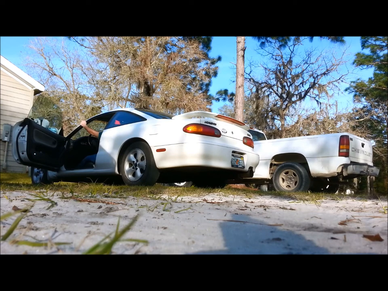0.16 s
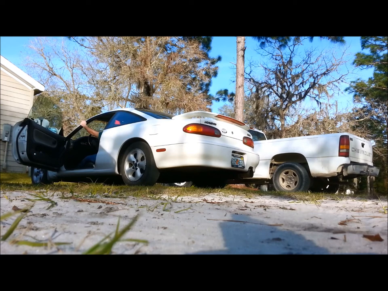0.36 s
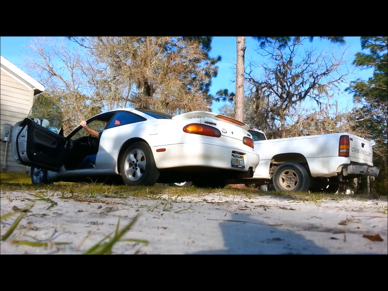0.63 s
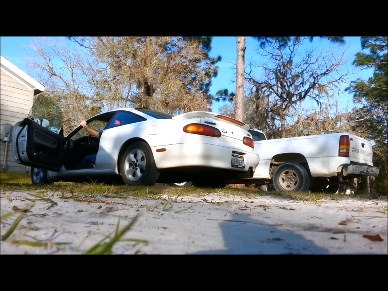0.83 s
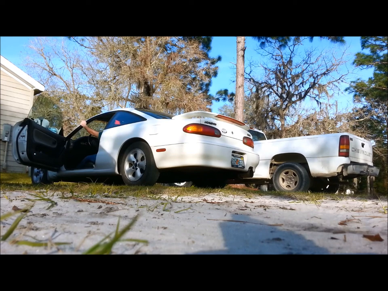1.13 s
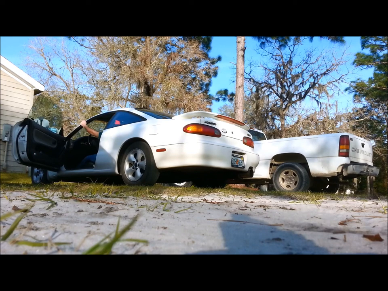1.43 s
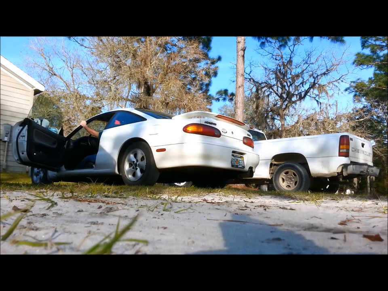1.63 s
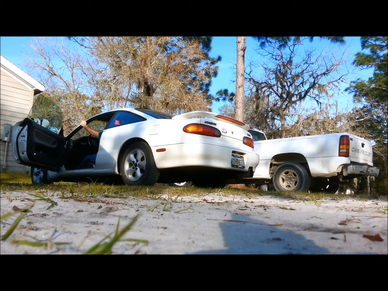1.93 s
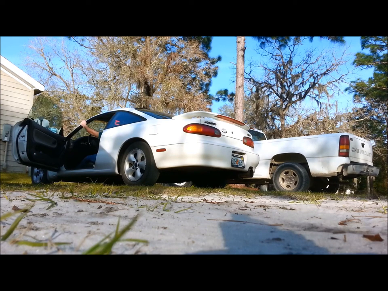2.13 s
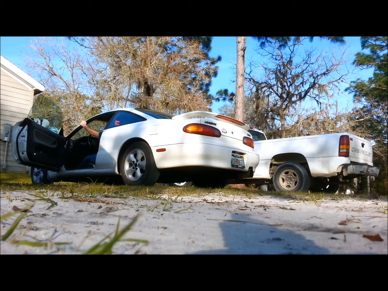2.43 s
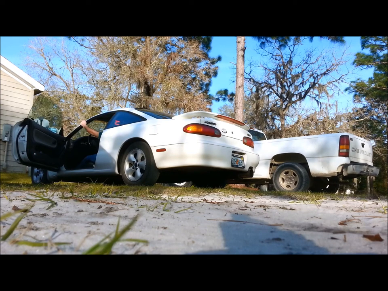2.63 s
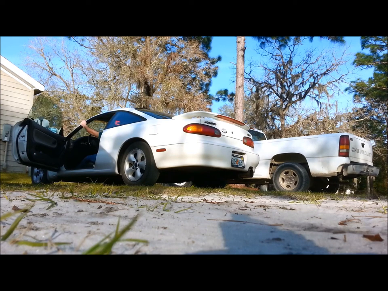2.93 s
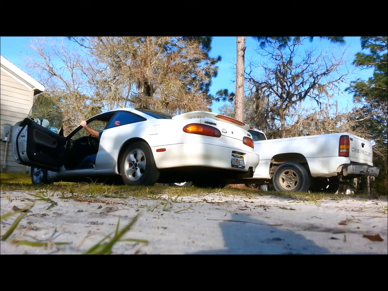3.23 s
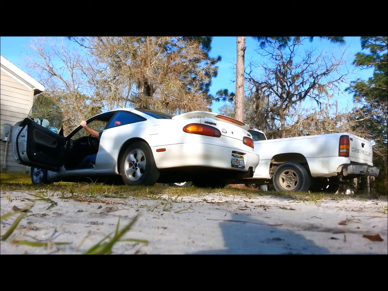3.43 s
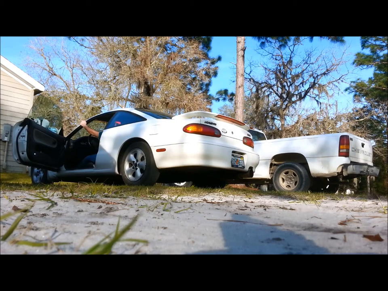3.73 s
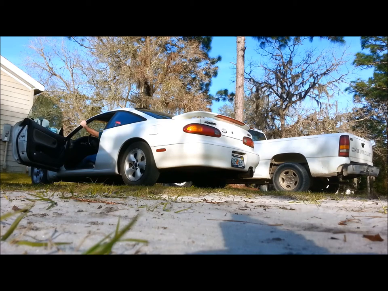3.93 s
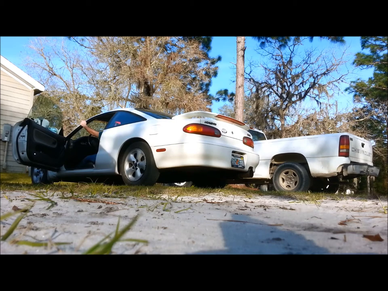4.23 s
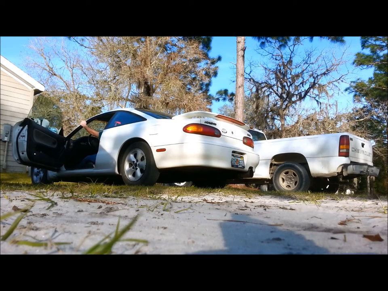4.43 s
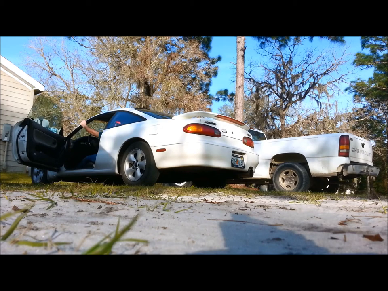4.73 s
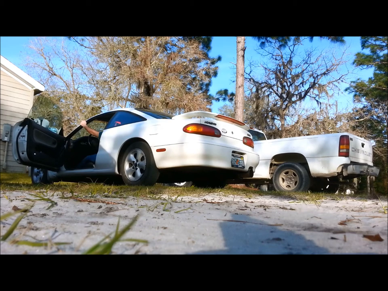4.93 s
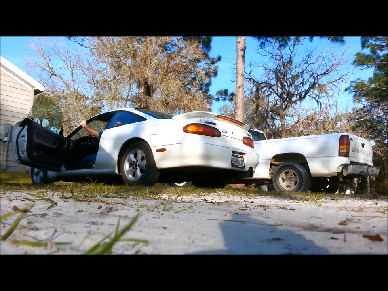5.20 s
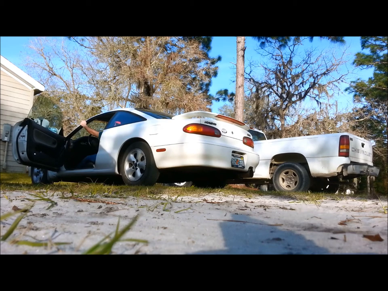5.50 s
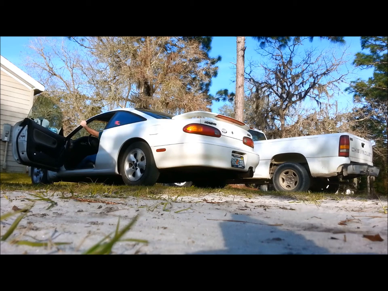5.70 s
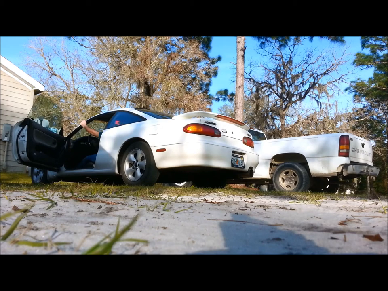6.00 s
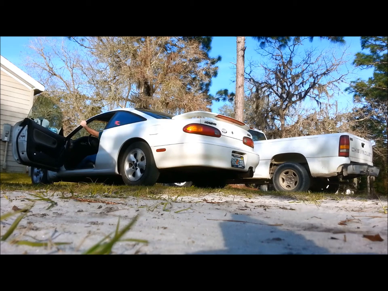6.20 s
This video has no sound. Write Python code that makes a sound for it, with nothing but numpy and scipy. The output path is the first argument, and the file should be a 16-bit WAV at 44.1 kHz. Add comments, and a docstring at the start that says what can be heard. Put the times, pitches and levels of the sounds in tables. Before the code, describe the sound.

Low burbling car exhaust outdoors, stabbed into five raspy, overloaded revs in two groups, each group's last and highest falling in a hollow drone.

```python
"""A V6 coupe idles in a yard and is revved in five blips, coasting down after each.
It stands a few metres from two microphones on the ground, with a short scattered tail around it.
Firings from two cylinder banks ring the exhaust: a low boom, a hollow bark and a metallic rasp over a drone.
Filtered noise makes tailpipe gas, intake song and microphone hiss; ringing clicks are the overload.
Engine speed and throttle set the exhaust's balance; the loudest peaks round off at full scale."""
import sys
import numpy as np
from scipy import signal
from scipy.io import wavfile
from scipy.ndimage import uniform_filter1d

SR = 44100
rng = np.random.default_rng(int(sys.argv[2]) if len(sys.argv) > 2 else 0)


def generate_wav(sig):
    """Save sig (samples, or channels by samples) to the path in sys.argv[1] as 16-bit PCM at SR."""
    pcm = np.round(np.clip(np.atleast_2d(sig).T, -1, 1) * 32767).astype(np.int16)
    wavfile.write(sys.argv[1], SR, pcm)


N = 280476
T = np.arange(N) / SR  # t/s

# engine speed, rounded later by the flywheel: t/s, firing rate f/Hz
SPEED = [(0, 44.8), (.41, 44.7), (.52, 54), (.6, 85.5), (.76, 126), (.89, 123.5), (1.03, 106.5),
         (1.11, 123.5), (1.3, 185), (1.42, 193), (1.6, 180.2), (2, 145), (2.6, 99.9), (3, 73.4),
         (3.42, 47.8), (3.56, 47.8), (3.69, 69), (3.84, 104), (3.96, 124), (4.11, 107.5), (4.22, 125),
         (4.39, 145), (4.63, 124), (4.87, 200), (4.98, 214.5), (5.4, 181.2), (5.8, 146), (6.36, 103.3)]
# throttle blips: middle of opening t/s, time to open t/s, length t/s, first surge level/dB,
# lull of the drone after shutting level/dB
BLIPS = [(0.451, .17, 0.26, 7.5, -8), (1.038, 0.032, 0.31, 3, 1), (3.57, 0.045, 0.31, -5.5, -22),
         (4.136, 0.029, 0.18, -1.5, -10), (4.604, 0.036, 0.34, 3.5, -2)]
SHUT_S, SURGE_S = 0.099, 0.07  # time the throttle takes to shut; decay of the first surge
LULL_AFTER_S, LULL_S = 0.088, 0.026  # the flow slackens just after the throttle shuts
STUMBLE_AFTER_S, STUMBLE_S = 0.17, 0.064  # then the engine burns unevenly for a moment

# relative strength of each cylinder in firing order: level/dB
CYLINDERS_DB = [-1.9, -0.6, 0.68, -0.92, -1, 1]
# each cylinder's front through its own runner, in firing order: relative level/dB, delay t/s
RUNNERS = [(1, .0004), (-3.5, 0.00013), (-3, 0.00068), (1.5, .0003), (0.5, 0.000077), (-3, .0005)]
CROSSOVER_S = 0.00051  # one bank's gas takes the longer pipe
COAST_SCATTER_DB, LOADED_SCATTER_DB = 0.95, 1  # scatter of the firings, throttle shut and open
STUMBLE_DB, IDLE_SCATTER_DB = 2, -0.2  # added to the scatter

# exhaust balance, throttle shut: firing rate f/Hz, then drone, boom, bark and rasp level/dB
COASTING = [(44.2, -60, -25, -38, -50), (59.8, -25.5, -19, -28, -42), (72, -22.5, -24, -26.5, -40),
            (83.2, -12, -18, -18, -31.5), (108.5, -15, -15.5, -17, -29.5), (120, -10, -16, -15.5, -26),
            (139.4, -13.5, -13.5, -18, -23), (171.85, -14, -27, -16, -20.5), (180.6, -9, -18, -20, -22),
            (198, -10.5, -25.5, -18, -19.5), (216.5, -8, -20, -18, -21.5)]
# exhaust balance, throttle open: firing rate f/Hz, then drone, boom, bark and rasp level/dB
PULLING = [(46.6, -36, -9, -26, -30.5), (65, -15, -5.5, -14.5, -24.5), (93, -13.5, -9.5, -12, -19),
           (128, -12, -13, -11, -16), (139, -17, -20.5, -16.5, -16.5), (197, -15, -37, -19, -16)]
# silencer resonances: f/Hz, width f/Hz, relative level/dB
BOOM = [(99.4, 24, 2.5), (140, 390, 3), (187, 42, 0.5), (204, 90, 0.5)]
# lower resonances along the whole pipe: f/Hz, width f/Hz, relative level/dB
BARK = [(356.7, 47, 2.5), (426, 13.8, 5.5), (443.5, 12, -8)]
# upper resonances of the bark: f/Hz, width f/Hz, relative level/dB
BARK_TOP = [(579, 26, -3), (639.8, 31, 1), (711, 50, -1)]
# tailpipe resonances: f/Hz, width f/Hz, relative level/dB
RASP = [(806, 310, -6.5), (1037, 100, -6.5), (1082, 73, 4), (1199, 180, 4.5), (1400, 11, -13.5)]
# metal tip of the tailpipe: f/Hz, width f/Hz, relative level/dB
TIP = [(1705, 200, 0)]
# dips cut by the silencer's chambers when little gas flows: f/Hz, width f/Hz, cancelling echo level/dB
NOTCHES = [(255.2, 65, -4.5), (514, 68, -1.5), (753, 58, -3.5)]
# the pipe's main mode, less damped when little gas flows: f/Hz, width f/Hz, added level/dB
GROWL = [(431.3, 30, -9.5)]

COAST_GAS_DB, GAS_DB_PER_OCTAVE = -58.5, 5  # tailpipe flow at 150 firings a second, and its rise with speed
HISS_DB = -57  # each side's even noise at 45 firings a second, before its lows are lifted
# spells of overload at full load and on the overrun: start t/s, length t/s, click drive level/dB,
# spitting gas flow level/dB, added rasp level/dB
OVERLOAD_SPELLS = [(0.524, .14, -36, -44.5, 0.5), (1.057, .14, -17, -35, 4), (1.21, 0.1, -31, -53.5, 1),
                   (1.508, .21, -34, -60, 5), (3.645, .2, -44, -52, -1), (4.17, 0.1, -41, -52, 0.5),
                   (4.623, 0.11, -20, -38, 4.5), (4.746, 0.12, -25.5, -45, 3),
                   (4.862, 0.063, -22, -35, 4.5), (4.927, 0.2, -39, -52, -1.5),
                   (5.068, 0.077, -29, -55, 5.5), (5.357, 0.16, -37, -57, 5)]
# click strength at each cylinder's firings during a spell, in firing order: relative level/dB
CLICK_DB = [3, -11, -3, -11.5, -7, -9]
CLICK_SCATTER_DB = 5
# single overload clicks: t/s, drive level/dB before the resonances
SINGLE_CLICKS = [(0.5611, -19), (0.6512, -12.5), (1.063, -12), (1.0786, -10), (1.1132, -20), (1.1709, -17),
                 (1.4003, -35.5), (2.2737, -32), (3.6955, -29), (3.7223, -24), (3.8323, -23), (4.1652, -27),
                 (4.2149, -25.5), (4.2466, -31), (4.2626, -25), (4.3643, -39), (4.6889, -6), (5.2095, -33),
                 (6.1519, -35)]
TOP_HZ = 14800  # upper limit of the microphones' sound


def undb(db):
    """Decibels to gain."""
    return 10 ** (np.asarray(db) / 20)


def noise():
    """White noise of rms 1."""
    return rng.standard_normal(N)


def cut(x, hz, kind, order=2):
    """Low- or high-pass, run both ways to leave the crests of the pulses in place."""
    sections = signal.butter(order, hz, kind, fs=SR, output="sos")
    return signal.sosfiltfilt(sections, x, padtype=None)


def ring(x, modes):
    """A sum of resonances."""
    total = 0
    for hz, width_hz, db in modes:
        b, a = signal.iirpeak(hz, hz / width_hz, fs=SR)
        total = total + undb(db) * signal.lfilter(b, a, x)
    return total


def steady(x, size=1500):
    """Hold the running rms near 1, over a window of so many samples."""
    power = uniform_filter1d(uniform_filter1d(x ** 2, size), size)
    return x / np.sqrt(np.abs(power) + 1e-18)


def late(x, lag_s):
    """Delay a sound."""
    return np.interp(T - lag_s, T, x)


def place(x, left_db):
    """Share a sound between the two microphones, left minus right in dB."""
    left = undb(left_db)
    return np.array([[left], [1]]) * 2 / (1 + left) * x


def yard(x, wet_db, t60):
    """Ground, cars and house wall scatter a short tail, different at each microphone."""
    t = np.arange(SR // 3) / SR
    decay = np.exp(-np.log(1000) * t / t60)
    tail = rng.standard_normal((2, len(t))) * decay * (t > 0.004)
    tail /= np.sqrt(np.sum(tail ** 2, axis=1, keepdims=True))
    return x + undb(wet_db) * signal.fftconvolve(x, tail, axes=1)[:, :N]


def ramp(at_s, length_s):
    """A step from 0 to 1, centred on a moment."""
    return np.clip((T - at_s) / length_s + 0.5, 0, 1)


def bump(at_s, width_s):
    """A brief swell around a moment."""
    return np.exp(-((T - at_s) / width_s) ** 2)


def at_speed(table, hz):
    """The columns of a table, read at the engine's firing rate."""
    rates, *columns = np.transpose(table)
    return np.array([np.interp(hz, rates, column) for column in columns])


def pedal():
    """What the blips do: throttle opening and first surge, then a lull and a stumble on shutting."""
    throttle = surge_db = lull_db = stumble = 0
    for opens, open_s, length, first_db, dip_db in BLIPS:
        shuts = opens + length
        held = ramp(opens, open_s) * (1 - ramp(shuts, SHUT_S))
        throttle = throttle + held
        surge_db = surge_db + first_db * held * np.exp(-np.maximum(T - opens, 0) / SURGE_S)
        lull_db = lull_db + dip_db * bump(shuts + LULL_AFTER_S, LULL_S)
        stumble = stumble + bump(shuts + STUMBLE_AFTER_S, STUMBLE_S)
    return throttle, surge_db, lull_db, stumble


def strike(times, sizes):
    """A train of clicks, each split between two neighbouring samples."""
    at = np.clip(times * SR, 0, N)
    whole = at.astype(int)
    part = at - whole
    first = np.bincount(whole, sizes * (1 - part), N + 2)
    second = np.bincount(whole + 1, sizes * part, N + 2)
    return (first + second)[:N]


def firings(hz, turns, scatter_db, wobble=0.0099):
    """Time and strength of each firing; the banks alternate and one arrives late."""
    k = np.arange(int(turns[-1]))
    strength_chance, time_chance = rng.standard_normal((2048, 2))[k].T
    times = np.interp(k, turns, T)
    rate = np.interp(times, T, hz)
    scatter = np.interp(times, T, scatter_db)
    bank_lag = (k % 2 - 0.5) * CROSSOVER_S
    # wobble: share of a firing interval per dB of scatter
    times = times + bank_lag + wobble * scatter * time_chance / rate
    return times, undb(np.resize(CYLINDERS_DB, len(k)) + scatter * strength_chance)


def steepen(times, sizes, hz, bank_db=1.5, power=0.96, spread_db=0.7):
    """Pulses steepen into fronts, each through its runner; the leading bank swaps on the overrun."""
    hz_per_s = np.gradient(uniform_filter1d(hz, SR // 8)) * SR
    load = np.tanh(hz_per_s / 20 + 1)
    k = np.arange(len(times))
    runner_db, runner_s = np.array(RUNNERS)[k % len(RUNNERS)].T
    chance = rng.standard_normal(2048)[k]
    lead_db = bank_db * (-1.0) ** k * np.interp(times, T, load)
    front_db = runner_db + lead_db + spread_db * chance
    return strike(times + runner_s - runner_s.mean(), sizes ** power * undb(front_db))


def puffs(pulses, decay_s):
    """Each pulse is followed by a dying burst of noise of the same energy."""
    keep = np.exp(-2 / (decay_s * SR))
    power = signal.lfilter([1 - keep], [1, -keep], pulses ** 2)
    return noise() * np.sqrt(power + 1e-18)


def churn(pulses, hz):
    """Gas tumbles in the silencer between slow firings and fades as the speed rises."""
    tumbling = puffs(pulses, decay_s=0.025) + np.sqrt(hz / SR) * noise()
    return (46 / hz) ** 2 * tumbling


def hollow(x, throttle):
    """With the throttle shut, echoes in the silencer cancel a few bands and the pipe growls."""
    return x + (1 - throttle) * (ring(x, GROWL) - ring(x, NOTCHES))


def boom(pulses, hz, turns, churn_db=-11):
    """The silencer rings with the overtones of the pulses."""
    # the swell at the firing rate itself leaves the pipe as the drone
    overtones = pulses - hz / SR * (1 + 2 * np.cos(2 * np.pi * turns))
    body = ring(overtones + undb(churn_db) * churn(pulses, hz), BOOM)
    body = cut(cut(body, 62, "high", order=4), 250, "low", order=4)
    return late(steady(body), lag_s=0.0003)


def bark(fronts, hz, churn_db=-1, open_hz=135, turbulence_db=-14):
    """The pipe rings hollow; slow firings are soft and hardly reach its upper resonances."""
    drive = fronts + undb(turbulence_db) * puffs(fronts, decay_s=0.0042)
    drive = drive + undb(churn_db) * churn(fronts, hz)
    rough = drive + undb(-7) * puffs(fronts, decay_s=0.004)
    top = ring(rough, BARK_TOP) * np.minimum(hz / open_hz, 1) ** 1.3
    # the lower modes build up along the whole pipe and answer later
    body = late(ring(drive, BARK), lag_s=0.0005)
    band = cut(cut(body + top, 240, "high"), 870, "low", order=3)
    return steady(band, size=5000)


def rasp(fronts, hz, tip_db=-15, edge_db=-18, churn_db=4, turbulence_db=-3):
    """The fronts and their turbulence ring the tailpipe and its metal tip."""
    drive = fronts + undb(turbulence_db) * puffs(fronts, decay_s=0.002)
    drive = drive + undb(churn_db) * churn(fronts, hz)
    pipe = cut(cut(ring(drive, RASP), 480, "high"), 1233, "low", order=5)
    tip = undb(tip_db) * ring(ring(drive, TIP), TIP)
    edge = undb(edge_db) * cut(cut(drive, 570, "high"), 1424, "low")
    return steady(pipe + tip + edge)


def exhaust(pulses, fronts, hz, swell, turns, throttle, levels_db):
    """The drone and three groups of resonances, the higher ones louder on the right."""
    drone_gain, boom_gain, bark_gain, rasp_gain = undb(levels_db)
    drone = np.sqrt(2) * np.cos(2 * np.pi * swell) * drone_gain
    booming = hollow(boom(pulses, hz, turns), throttle) * boom_gain
    low = place(drone + booming, left_db=-0.4)
    barking = hollow(bark(fronts, hz), throttle) * bark_gain
    rasping = rasp(fronts, hz) * rasp_gain
    high = place(barking, left_db=-1.9) + place(rasping, left_db=-5.8)
    return yard(low, wet_db=-22, t60=0.07) + yard(high, wet_db=-8.5, t60=0.18)


def gas(fronts, hz, rush):
    """The tailpipe jet hisses in time with the firings, more with speed and when it spits."""
    flow = rush + undb(COAST_GAS_DB + GAS_DB_PER_OCTAVE * np.log2(hz / 150))
    turbulence = puffs(fronts, decay_s=0.0079)
    jet = ring(turbulence, [(2100, 330, 9), (3230, 460, -5), (7900, 3300, -14)])
    jet = steady(cut(jet, 16000, "low", order=1)) * flow
    return yard(place(jet, left_db=-22), wet_db=-12.5, t60=0.047)


def hiss(hz, sink_db=4):
    """Faint microphone hiss, turned down as the engine speeds up, by so many dB an octave."""
    floor = np.array([noise(), noise()]) + 0.096 * noise()  # a little is common to both sides
    floor = floor + 1.3 * cut(floor, 1700, "low", order=1)
    return floor * undb(HISS_DB - sink_db * np.log2(hz / 45))


def spells(fade_s=0.0083):
    """Strength of the overload clicks, flow of spitting gas and added rasp through time."""
    start, length, click_db, gas_db, rasp_db = np.transpose(OVERLOAD_SPELLS)
    gates = np.array([ramp(s, fade_s) - ramp(s + held, fade_s) for s, held in zip(start, length)])
    return undb(click_db) @ gates, undb(gas_db) @ gates, rasp_db @ gates


def spell_clicks(times, strength):
    """During a spell each firing sets off an overload click of uneven strength."""
    k = np.arange(len(times))
    chance = rng.standard_normal(2048)[k]
    click_db = np.resize(CLICK_DB, len(k)) + CLICK_SCATTER_DB * chance
    return strike(times, np.interp(times, T, strength) * undb(click_db))


def overload(in_spells, trim_db=3, fizz_db=-6, low_db=17, soft_hz=7000):
    """Sharp overload clicks on the peaks, singly and in spells; the single ones are fuller and lower."""
    times, drive_db = np.transpose(SINGLE_CLICKS)
    singles = undb(trim_db) * strike(times, undb(drive_db))
    clicks = singles + undb(trim_db) * in_spells
    fizz = np.array([puffs(clicks, decay_s=0.0014), puffs(clicks, decay_s=0.0022)])  # left, right
    clicks = clicks + undb(fizz_db) * fizz
    edge = ring(clicks, [(1900, 760, 22.2), (3400, 690, 2.3)])
    edge = cut(cut(edge, 1100, "high"), soft_hz, "low", order=1)
    low_part = undb(low_db) * ring(singles, [(680, 290, 0.5), (1250, 210, 14.5)])
    return place(edge + low_part, left_db=-8)


def intake(hz, level_db=-58, best_hz=145, range_hz=30):
    """Air sings past the shut throttle plate in a narrow range of falling engine speed."""
    plate = [(2930, 210, 0)]
    song = steady(ring(ring(noise(), plate), plate))
    falling = np.gradient(hz) < 0
    near_best = np.exp(-((hz - best_hz) / range_hz) ** 2)
    tuning = uniform_filter1d(falling * near_best, SR // 3) ** 2
    return place(song * undb(level_db) * tuning, left_db=-14)


def scene():
    """The engine speed times the firings; speed and throttle set how loud and how even they are."""
    hz = np.interp(T, *np.transpose(SPEED))
    hz = uniform_filter1d(hz, size=SR // 20)  # the flywheel rounds every change
    throttle, surge_db, lull_db, stumble = pedal()
    clicking, rush, roar_db = spells()

    levels_db = (1 - throttle) * at_speed(COASTING, hz) + throttle * at_speed(PULLING, hz)
    drone_db, boom_db, bark_db, rasp_db = levels_db + surge_db
    levels_db = [drone_db + lull_db, boom_db, bark_db, rasp_db + roar_db]
    scatter_db = (1 - throttle) * COAST_SCATTER_DB + throttle * LOADED_SCATTER_DB
    scatter_db = scatter_db + STUMBLE_DB * stumble + IDLE_SCATTER_DB * (hz.min() / hz) ** 2

    swell = np.cumsum(hz) / SR  # in firing cycles
    # below the silencer's resonance the swell of flow runs ahead of the pulses
    turns = swell - np.minimum((51 / hz) ** 2.7, 0.8)
    times, sizes = firings(hz, turns, scatter_db)
    fronts = steepen(times, sizes, hz)
    pipe = exhaust(strike(times, sizes), fronts, hz, swell, turns, throttle, levels_db)
    jet = gas(fronts, hz, rush)
    clicks = overload(spell_clicks(times, clicking))
    return pipe + jet + clicks + intake(hz) + hiss(hz)


def record(dry, fade_s=0.004):
    """Round off the loudest peaks at full scale, fade the very end and cut the top."""
    knee = 20  # higher is a harder corner
    clipped = dry / (1 + np.abs(dry) ** knee) ** (1 / knee)
    faded = clipped * np.minimum((T[-1] - T) / fade_s, 1)
    top_cut = signal.ellip(10, 0.1, 70, TOP_HZ, fs=SR, output="sos")
    return signal.sosfilt(top_cut, faded)


dry = scene()
out = record(dry)
generate_wav(out)
```